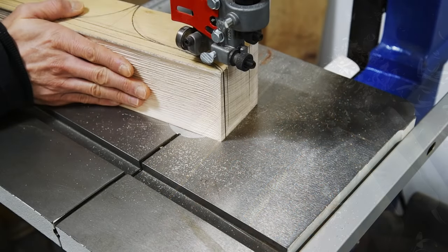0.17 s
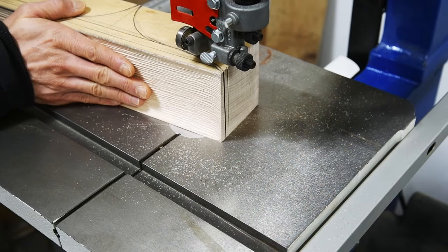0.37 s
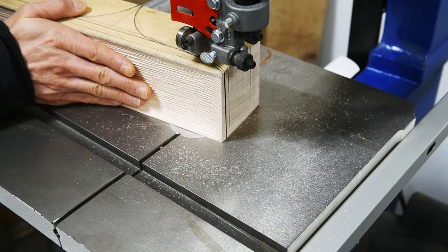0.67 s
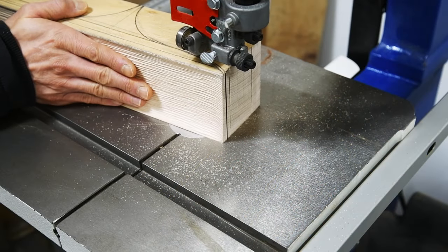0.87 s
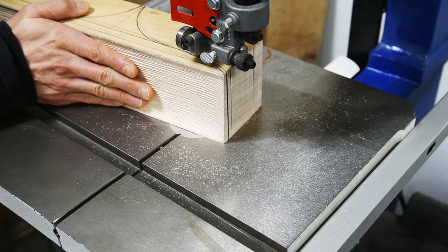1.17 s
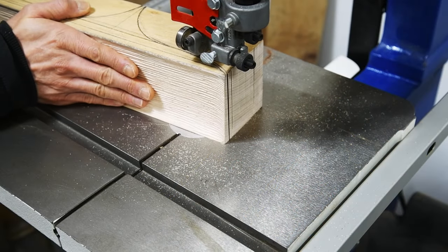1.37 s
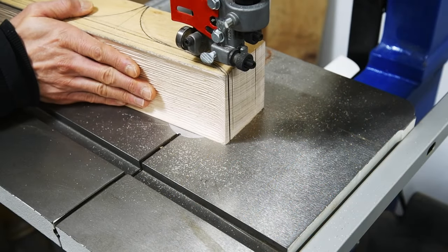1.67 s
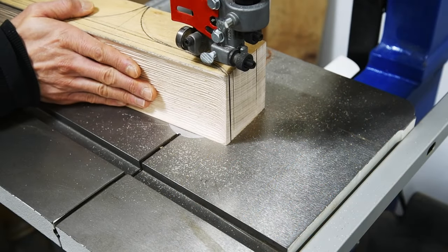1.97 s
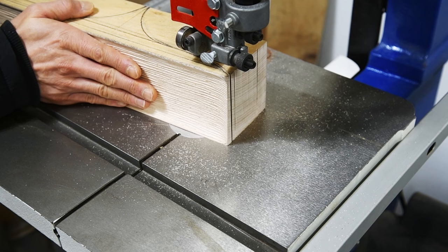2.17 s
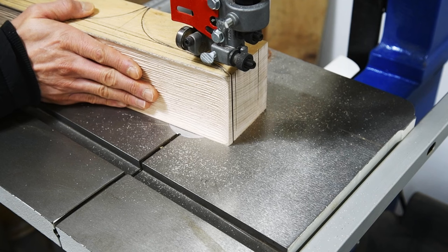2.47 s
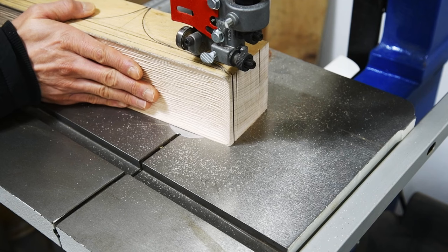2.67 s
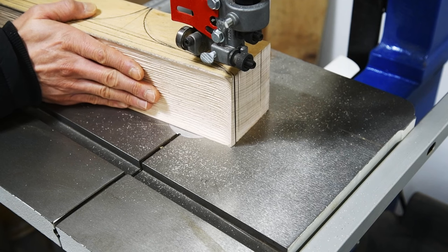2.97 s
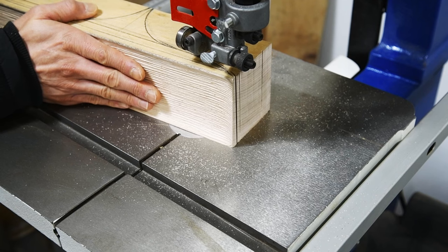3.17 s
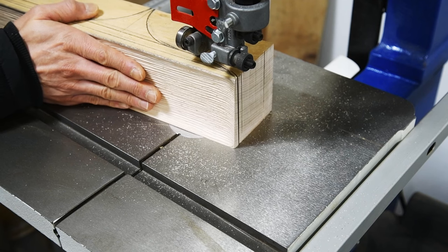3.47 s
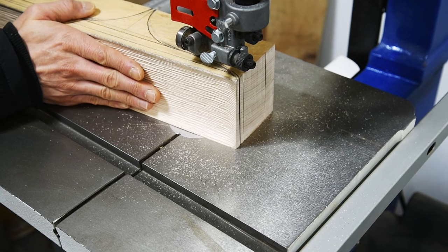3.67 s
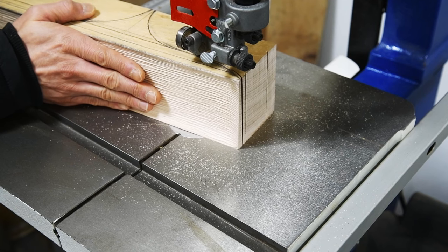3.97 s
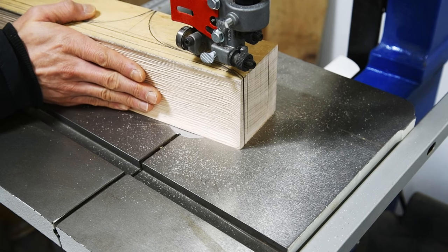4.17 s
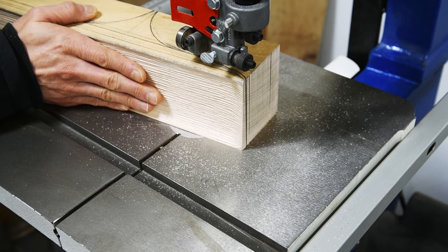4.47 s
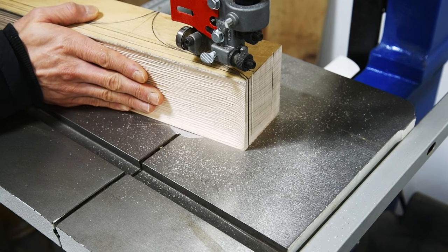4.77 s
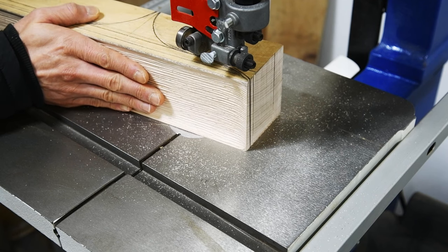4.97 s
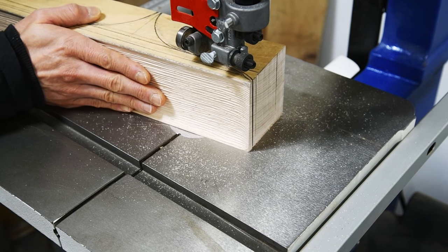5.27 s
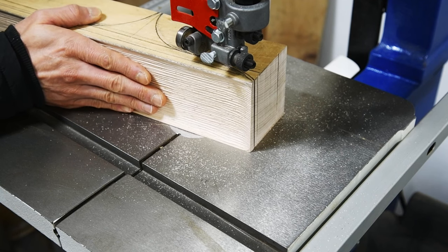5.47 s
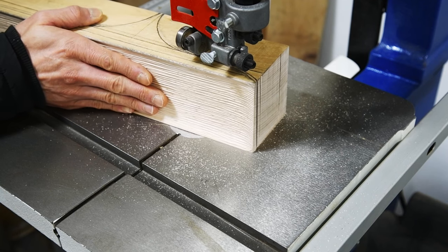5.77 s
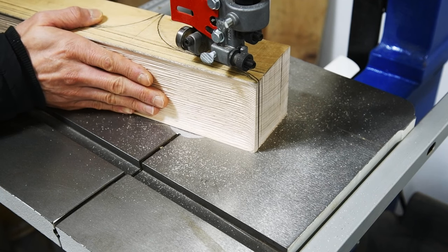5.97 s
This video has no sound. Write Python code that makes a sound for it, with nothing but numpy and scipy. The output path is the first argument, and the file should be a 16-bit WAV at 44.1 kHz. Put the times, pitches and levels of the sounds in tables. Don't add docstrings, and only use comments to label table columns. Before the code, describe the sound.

Close, gritty band saw cutting wood: piercing wavering blade squeal, rapid tooth buzz and dry hiss, faint at first, cresting, then settling back.

```python
import sys
import numpy as np
from scipy import signal
from scipy.fft import rfft, irfft, next_fast_len
from scipy.io import wavfile
from scipy.ndimage import uniform_filter1d, map_coordinates

SR = 44100
rng = np.random.default_rng(int(sys.argv[2]) if len(sys.argv) > 2 else 0)


def transcribe(signal):
    frames = np.atleast_2d(signal).T
    limited = np.clip(frames, -1, 1)
    pcm = np.round(limited * 32767).astype(np.int16)
    wavfile.write(sys.argv[1], SR, pcm)


def boost(x):
    u = np.asarray(x, float) / 20
    return 10 ** u


N = 269892
STEP = 16

STRONG_OVERTONES = (4, 6, 7, 8, 1, 9, 10, 13)
# shallow-cut level, deep-cut level, both in dB re whole sound.
STRONG_REST_DB = [(-16.5, -18.5), (-19, -21), (-15.5, -21), (-25, -22), (-33, -28), (-21, -31),
                  (-20, -29.5), (-21, -29)]
# centre in seconds,
# length in seconds, level in dB re whole sound.
GRAIN_FLARES = [
    [(.12, 0.088, -10), (.2, .05, -18), (.35, 0.055, -3), (.41, .05, -9), (.57, 0.047, -4),
     (.64, 0.1, -1.5), (.98, 0.1, -8), (1.06, 0.034, -12), (1.2, 0.031, -3), (1.27, .04, -14),
     (1.34, 0.053, -1), (1.4, 0.036, -6), (1.5, 0.09, -7.5), (1.59, 0.054, -4), (1.8, 0.12, 3.5),
     (1.93, 0.12, -8.5), (2.12, 0.17, -7), (2.38, 0.047, -13), (2.45, 0.074, -9), (3.35, 0.18, -14),
     (4.38, 0.1, -10.5), (5.03, 0.23, -17), (5.68, 0.11, -12), (5.88, 0.17, -15)],
    [(.05, 0.21, -10), (2.1, 0.083, -12), (1.57, .04, -10), (1.85, 0.12, -20), (2.83, 0.035, -11),
     (2.9, .03, -16), (2.98, 0.036, -5), (3.07, 0.039, -12), (4.2, 0.29, -18), (4.85, 0.081, -17),
     (5.3, 0.11, -21), (5.45, 0.24, -6), (5.6, 0.12, -31), (5.65, 0.11, -27), (6.1, 0.074, -18)],
    [(.12, 0.035, -22), (.21, 0.039, -27), (.31, 0.088, -11), (.4, 0.11, -12), (.47, 0.034, -11),
     (.53, 0.047, -13), (.58, 0.053, -10), (1.21, 0.025, -9), (1.27, 0.04, -12), (1.57, 0.046, -10),
     (1.85, 0.06, -10), (2.15, 0.052, -7), (2.35, 0.26, -15), (2.59, 0.074, -9), (2.67, 0.069, -14),
     (2.84, 0.048, -16), (5.9, 0.3, -26)],
    [(1.57, .06, -20), (1.83, 0.073, -16), (2.35, 0.3, -10.5), (3.0, .15, -17), (4.38, 0.14, -14),
     (5.77, 0.06, -20), (5.95, 0.12, -18)],
]
# centre in seconds, length in seconds,
# level in dB re whole sound.
FAINT_GRAIN_FLARES = [
    [(.35, 1, -29), (1.94, 0.19, -16), (2.32, 0.08, -24), (2.98, 0.042, -15), (4.14, 0.051, -20),
     (4.67, 0.046, -21), (4.82, 0.046, -30), (5.12, 0.1, -23)],
    [(.28, .1, -20), (.87, 0.13, -19), (1.15, 0.085, -13), (1.46, .1, -19), (2.25, 0.25, -16),
     (3.7, .1, -22), (4.6, 0.19, -15), (5.2, 0.19, -14), (6.08, 0.11, -16)],
    [(.98, 0.063, -7), (1.24, 0.093, -10), (1.63, .05, -15), (1.86, 0.094, -20), (2.27, 0.38, -14.5),
     (2.76, .04, -13), (2.86, .05, -18), (3.2, .05, -28), (3.36, 0.074, -11), (3.48, 0.21, -11.5),
     (3.74, 0.17, -12), (4.4, 0.22, -20), (4.78, 0.037, -17), (5.2, .2, -13)],
    [(.2, 0.22, -31), (1.12, .08, -12), (1.8, 0.081, -13), (2.2, 0.23, -15)],
]
# multiple of the tooth rate, level in dB re whole sound.
OTHER_OVERTONES = [(2, -32), (3, -27), (5, -26), (11, -26.5), (12, -28), (14, -29), (15, -31), (16, -29),
                   (17, -32), (18, -31), (20, -32)]
# centre in seconds, length in seconds, lift in dB.
GRAIN_BITES = [
    (1.15, .4, 2),
    (1.85, .2, 2),
    (2.28, .3, 4),
    (4.4, .25, 2),
]


def teeth(tooth, belt):
    def smear(k):
        return (.4 + .075 * k) * wobble(45) + (.45 + .035 * k) * wobble(140)

    lift_db = settled(shallow_db=3.5, deep_db=0) + swells_db(GRAIN_BITES)
    buzz = 0
    for k, rest_db, flares in zip(STRONG_OVERTONES, STRONG_REST_DB, GRAIN_FLARES + FAINT_GRAIN_FLARES):
        resting = boost(settled(*rest_db) + 1.6 * wobble(14))
        flicker = boost(1.5 * wobble(36) + 2.6 * wobble(80))
        gain = (resting + swells(flares, flat=2.4)) * flicker
        buzz = buzz + np.sqrt(2) * gain * np.sin(k * tooth + smear(k))
    for k, db in OTHER_OVERTONES:
        k = round(k)
        gain = boost(db + (k > 8) * lift_db + 3.6 * wobble(24))
        buzz = buzz + np.sqrt(2) * gain * np.sin(k * tooth + smear(k))
    return buzz * (1 + .24 * np.cos(belt - 1.9))


# time in seconds, level in dB re whole sound.
SONG_LEVEL = [(0, -1), (.15, -9), (.62, -7.5), (.8, 0.5), (1.3, -8), (1.5, 0.5), (1.72, 0.5), (1.81, -16),
              (1.95, 4), (2.22, 0.5), (2.33, -15), (2.45, -2), (2.5, 1.5), (2.74, 6), (2.9, -7),
              (3.05, 1.5), (3.4, -2.5), (4.4, -3), (5.2, -3.5), (5.45, -3.5), (5.6, -3.5), (6.12, -5.5)]
# centre in Hz, half width in Hz.
SONG_BANDS = [(2121, 3.86), (2155, 7.3), (2203, 9.3), (2245, 4.2)]
# shallow-cut level in dB, deep-cut level in dB.
SONG_BANDS_DB = [(-8, -.5), (-1.2, -11), (-11, -8), (-9, -12)]
# centre in seconds, length in seconds,
# change in dB.
LEAD_SPELLS = [
    [(.03, 0.097, 15), (1.05, 0.33, 4.5), (1.55, 0.22, 5.5), (2.1, 0.34, 0), (2.8, 0.39, 14),
     (4.15, 0.26, -4), (4.7, 0.17, 5), (4.9, 0.095, -4)],
    [(.03, 0.16, -13), (.3, 0.23, -2), (2.55, 0.093, 4), (4.12, 0.09, 16), (4.9, 0.17, 13), (5.1, 0.11, -3),
     (5.75, .15, -2)],
    [(.35, 0.55, 9), (1.75, 0.11, 16), (2.9, 0.47, 3), (3.5, 0.67, 6.5), (4.45, .2, 3), (5.0, 0.12, 4)],
    [(.3, 0.52, -11), (2.0, 0.22, 0), (2.7, .2, -17), (5.65, 0.11, 9), (5.95, .12, 16)],
]


def squeal(wheel, belt):
    sing_db, = curves(SONG_LEVEL)
    blur_db = 2.5 * np.clip(np.arange(N) / SR - 3.37, 0, None)
    song = boost(sing_db + blur_db + settled(-10.5, -8.5)) * band(2163, 60, steep=2.8)
    for (hz, half_hz), mode_db, spells in zip(SONG_BANDS, SONG_BANDS_DB, LEAD_SPELLS):
        level_db = sing_db - blur_db + settled(*mode_db) + 1.2 * wobble(5.5) + swells_db(spells)
        song = song + boost(level_db) * band(hz, 1.49 * half_hz, steep=1.67)
    swing = np.sqrt(np.abs(uniform_filter1d(song ** 2, size=82)) / boost(2 * sing_db))
    flutter = (1 + .38 * np.cos(wheel)) * (1 + .16 * np.cos(belt + .95))
    undertone = boost(.68 * sing_db + settled(-21, -28.5)) * band(1066, 8.1)
    return undertone + song * (swing + .15) ** -.5 * flutter


# frequency in Hz, level in dB per Hz.
CUT_COLOUR = [(12, -58), (20, -40), (652, -12), (771, -13), (912, -14), (1050, -12.5), (1940, -13),
              (2160, 4.5), (2490, -16), (3020, -13.5), (3670, -16.5), (3990, -16), (7590, -20),
              (14400, -23.5), (15700, -24)]
# centre in Hz, width in
# Hz, level in dB.
SAW_MODES = [(1072, 16, 2), (1330, 97, -4.5), (1585, 47, 3), (2660, 94, -4.5), (2820, 43, -2),
             (4330, 54, -3.5), (5560, 250, -9), (6880, 61, 2.5), (7420, 100, -5),
             (7650, 120, -4.5), (8530, 110, -1), (9140, 110, -11), (9740, 320, -6), (10300, 250, -9.5),
              (10600, 150, -7), (11100, 140, -5), (12200, 180, -1), (12160, 260, -3), (13450, 200, -5),
              (14140, 200, 1.5), (14400, 360, -6), (15500, 82, -3)]
# centre in Hz, width in Hz, level in dB.
BURIED_MODES = [(470, 16, -1), (2970, 49, -9), (4195, 45, -1), (4790, 50, 0), (5130, 66, 0), (5470, 25, -1),
                (5850, 120, -9), (6620, 110, 3), (6770, 65, -3), (7530, 340, -1.5), (7690, 82, 1.5)]
# shallow-cut level, deep-cut level, both in dB re whole sound.
CUT_PARTS_DB = [
    (-16, -12.5),
    (-6, -5.5),
    (-5.5, -6),
]
# centre in seconds, length in seconds, change in dB.
NOISE_SWINGS = [(.68, 0.035, 2), (.8, 0.035, -3), (.88, .04, 2), (1.7, 0.037, -2.5), (1.79, 0.038, -1.5),
                (2.2, .04, 0), (2.74, 0.13, 3.5), (3.05, .04, 0.5), (3.24, .05, 0), (3.44, 0.042, 0.5),
                (4.19, 0.031, -4)]
# centre in seconds, length in seconds, level in dB re whole sound.
KNOT_THUDS = [
    (1.41, 0.15, -8.5),
    (2.24, 0.081, -13),
    (2.55, 0.082, -32),
    (2.97, 0.31, -16),
    (3.944, 0.11, -12),
    (4.926, 0.074, -14),
    (5.24, 0.086, -12),
    (6.03, 0.064, -23),
]
# centre in seconds, length in seconds, level in dB re whole sound.
CHIP_SPITS = [
    (1.384, 0.044, -22),
    (1.566, 0.058, -3),
    (1.85, .06, -32),
    (2.5, .06, -23),
    (2.66, 0.059, -22),
    (2.84, 0.047, -11),
    (2.965, 0.07, -5),
    (3.86, .08, -21),
    (4.403, 0.13, -10),
]
# centre in seconds, length in seconds,
# level in dB re whole sound.
TABLE_SHUDDERS = [(0.206, 0.09, -18), (0.373, .06, -21), (0.53, 0.09, -16), (1.106, 0.064, -16),
                  (1.245, 0.16, -15), (1.41, 0.041, -19), (1.704, 0.21, -18.5), (1.925, 0.17, -8.5),
                  (2.287, 0.21, -21), (2.882, 0.065, -14), (3.342, 0.13, -19.5), (4.656, 0.045, -10.5)]


def cut(tooth, wheel, belt):
    colour_hz, colour_db = np.transpose(CUT_COLOUR)

    def below(hz, edge_hz):
        return 1 / (1 + (hz / edge_hz) ** 6)

    def resonance(hz, rows):
        return sum(boost(db) ** 2 / (1 + (2 * (hz - centre) / width) ** 2) for centre, width, db in rows)

    def body(hz):
        colour = boost(np.interp(np.log(hz + 1), np.log(colour_hz + 1), colour_db))
        return colour * np.sqrt(1 + 4 * boost(-1.0) * resonance(hz, SAW_MODES))

    surge = boost(.4 * wobble(20) + 2.3 * wobble(62) + .3 * np.cos(belt - 2.2))
    strokes = (1 + .2 * np.cos(tooth)) * (1 + .14 * np.cos(wheel + np.pi))
    gate = strokes * surge * boost(swells_db(NOISE_SWINGS))
    noise = gate * patchy(depth_db=2.6, wide=4, long=10)
    rung = filtered(noise, body)
    buried = unit(filtered(noise, lambda hz: resonance(hz, BURIED_MODES)))

    def part(share):
        return unit(filtered(rung, lambda hz: np.sqrt(np.abs(share(hz)))))

    block = part(lambda hz: below(hz, 2200))
    chips = part(lambda hz: below(hz, 7730) - below(hz, 2650))
    tips = part(lambda hz: 1 - below(hz, 9500))
    block_gain, chips_gain, tips_gain = [boost(settled(*level_db)) for level_db in CUT_PARTS_DB]
    block_gain = block_gain + swells(TABLE_SHUDDERS) + swells(KNOT_THUDS)
    tips_gain = tips_gain + swells(CHIP_SPITS)
    return block_gain * block + chips_gain * chips + tips_gain * tips + boost(settled(-37, -14.5)) * buried


# centre in seconds, length in seconds,
# level in dB re whole sound.
THIRD_OVERTONE_FLARES = [
    (.25, 0.17, -17),
    (.9, 0.091, -21),
    (1.3, .08, -12),
    (1.8, 0.2, -6),
    (1.92, .1, -7),
    (2.08, 0.11, -13),
    (2.32, 0.46, -21),
    (2.95, 0.12, -10),
    (5.07, 0.091, -13),
    (5.65, .1, -7),
]


def third_overtone():
    return swells(THIRD_OVERTONE_FLARES) * band(2338, 29, steep=3.0)


# centre in seconds, length in seconds, level in dB re whole sound.
SPLINTER_SQUEAKS = [
    (2.85, 0.034, -9),
    (4.35, .15, -18),
    (5.24, .1, -9),
    (5.46, 0.076, -11),
    (5.635, 0.056, -7),
    (5.72, .05, -13),
    (5.81, 0.091, -8),
]


def splinter_squeaks():
    return swells(SPLINTER_SQUEAKS) * band(5710, 30, steep=1.8)


# centre in seconds, length in seconds, level in dB re whole sound.
GUIDE_RUBS = [(.26, 0.12, -21), (1.54, .04, -25), (1.63, 0.044, -12), (1.69, 0.07, -6), (2.38, 0.12, -16),
              (2.6, .12, -23), (3.12, 0.14, -26), (3.32, 0.14, -12.5), (3.5, 0.089, -23),
              (3.92, 0.064, -11), (4.65, 0.13, -15), (5.1, 0.25, -24), (5.6, 0.44, -35)]


def guide():
    rough = boost(2 * wobble(25)) * band(3992, 16, steep=1.5)
    return (boost(settled(-20.5, -16)) + swells(GUIDE_RUBS)) * rough


# centre in seconds, length in seconds, level in dB re whole sound.
BLOCK_SCRAPES = [(1.42, 0.09, -19), (1.58, 0.11, -6), (1.85, 0.074, -13), (2.05, 0.078, -3.5),
                 (2.22, .06, -6.5), (2.53, 0.09, -6), (2.96, 0.064, 0), (3.03, 0.086, -12),
                 (3.78, 0.13, -6), (4.82, .08, -10), (5.25, 0.053, -13)]


def block_and_table():
    table = (boost(settled(-25.5, -28)) + swells(TABLE_SHUDDERS)) * band(549.8, 15, steep=1.36)
    block = boost(settled(-14, -20) + 1.4 * wobble(6.4)) * band(3330, 190, steep=0.88)
    panel = swells(BLOCK_SCRAPES) * band(2920, 93, steep=1.2)
    return table + block + panel


# frequency in Hz, level in dB re whole sound.
MOTOR_TONES = [(712, -30), (1366, -30.5)]


def motor():
    hum = boost(-62 + 3.4 * wobble(8.4) + 3.3 * wobble(15)) * band(200, 240, steep=6.0)
    for hz, db in MOTOR_TONES:
        gain = boost(db + settled(2.5, .5) + .6 * wobble(2.71))
        hum = hum + np.sqrt(2) * gain * np.sin(turns(hz, .9, 8))
    return hum


def unit(x):
    return x / np.sqrt(np.mean(x ** 2) + 1e-20)


def curves(rows):
    s, *columns = np.transpose(rows)
    return [np.interp(np.arange(N) / SR, s, column) for column in columns]


def wobble(rate):
    coarse = np.arange(0, N + STEP, STEP)
    knots = rng.standard_normal(int(N * rate / SR) + 4)
    return np.interp(np.arange(N), coarse, map_coordinates(knots, [coarse * rate / SR], order=2))


def turns(hz, spread_hz=0, rate=30):
    return 2 * np.pi * (rng.random() + np.cumsum(hz + spread_hz * wobble(rate)) / SR)


def filtered(x, response):
    m = next_fast_len(N + 8192)
    return irfft(rfft(x, m) * response(np.fft.rfftfreq(m, 1 / SR)), m)[:N]


def patchy(depth_db, wide=8, long=10):
    z = signal.stft(rng.standard_normal(N + 512), nperseg=512)[2]
    field = uniform_filter1d(rng.standard_normal(z.shape), int(wide), 0)
    field = uniform_filter1d(field, int(long), 1)
    return signal.istft(z * boost(depth_db * unit(field)), nperseg=512)[1][:N]


def band(centre_hz, half_hz, steep=1.87):
    noise = rng.standard_normal(N)
    return unit(filtered(noise, lambda hz: 1 / (1 + np.abs((hz - centre_hz) / half_hz) ** steep)))


def settled(shallow_db, deep_db):
    settle_s, width_s = 2.64, .04
    return shallow_db + (deep_db - shallow_db) / (1 + np.exp((settle_s - np.arange(N) / SR) / width_s))


def bells(rows, heights, flat):
    t = np.arange(0, N + STEP, STEP) / SR
    bumps = sum(h * np.exp(-np.abs(2 * (t - s) / length) ** flat) for (s, length, _), h in zip(rows, heights))
    return np.interp(np.arange(N) / SR, t, bumps)


def swells(rows, flat=2):
    return bells(rows, [boost(db) for _, _, db in rows], flat)


def swells_db(rows):
    return bells(rows, [db for _, _, db in rows], flat=2)


# time in seconds, teeth a second.
BLADE_SPEED = [(0, 771), (.12, 776), (.3, 785), (.65, 785), (.85, 779), (1.2, 780), (1.7, 783), (2.5, 783),
               (2.8, 778), (6.12, 777.5)]


def scene():
    speed, = curves(BLADE_SPEED)
    tooth = turns(speed, 2, 12)
    belt = 2 * np.pi * np.cumsum(speed) / SR / 57.55
    wheel = 6 * belt + .7 + .5 * wobble(4)
    saw = teeth(tooth, belt) + squeal(wheel, belt) + cut(tooth, wheel, belt)
    rings = third_overtone() + splinter_squeaks() + guide() + block_and_table()
    mix = saw + rings + motor()
    return np.array([mix, mix])


def band_limit(x):
    return signal.sosfilt(signal.butter(12, 15810, fs=SR, output="sos"), x)


# time in seconds, level in dB rms.
PLAYBACK_LEVEL = [(0.0, -52.5), (0.73, -52), (1.67, -45), (1.81, -41), (1.89, -42.5), (1.99, -41),
                  (2.38, -37), (2.57, -35), (2.66, -35), (2.71, -35.5), (3.0, -39), (3.34, -41),
                  (4.99, -41.5), (6.12, -41)]


def record(dry):
    mic = dry[0]
    top, hardness = .52, 2
    mean_power = np.abs(uniform_filter1d(mic ** 2, size=21))
    drive = np.sqrt(.65 * mic ** 2 + .35 * mean_power)
    clipped = mic / (1 + (drive / top) ** hardness) ** (1 / hardness)

    def tone(hz):
        bass_cut = 1j * hz / (42 + 1j * hz)
        treble_cut = (hz < 15750) / (1 + 1j * hz / 16000)
        phase_turn = (5000 - 1j * hz) / (5000 + 1j * hz)
        return bass_cut * treble_cut * phase_turn

    track = boost(curves(PLAYBACK_LEVEL)[0]) * unit(filtered(clipped, tone))
    return band_limit(np.array([track, track]))


dry = scene()
out = record(dry)
transcribe(out)
```